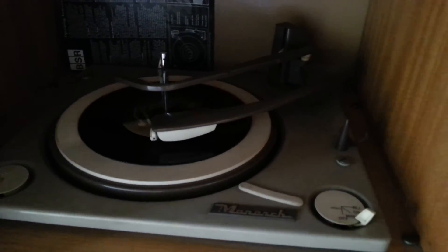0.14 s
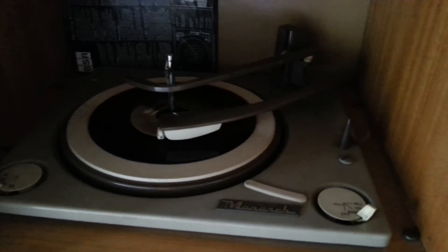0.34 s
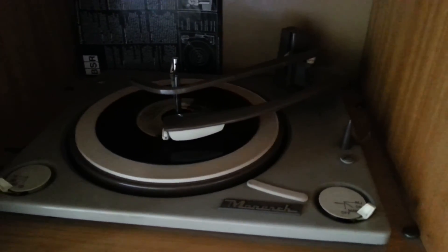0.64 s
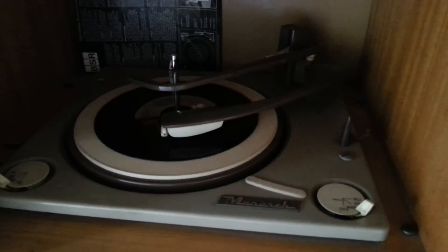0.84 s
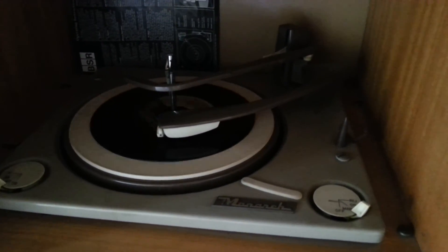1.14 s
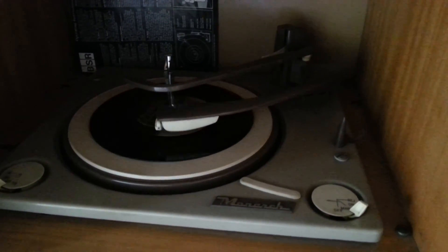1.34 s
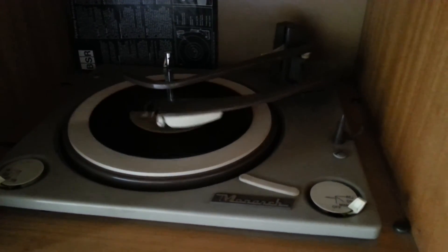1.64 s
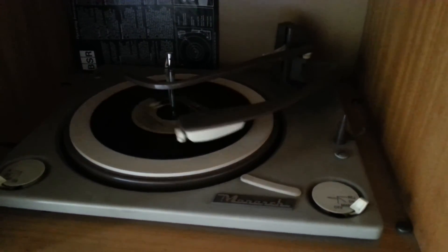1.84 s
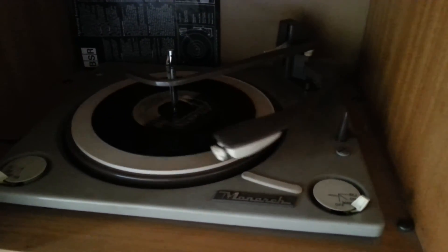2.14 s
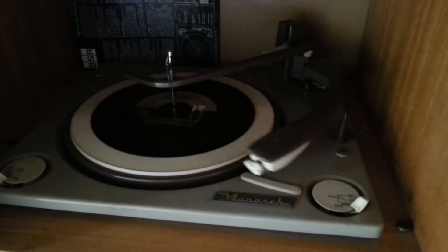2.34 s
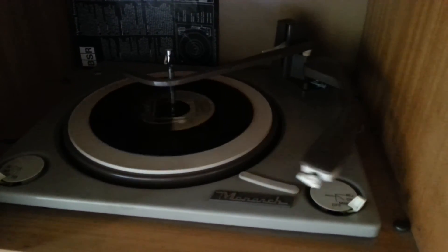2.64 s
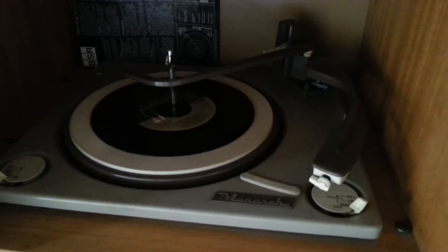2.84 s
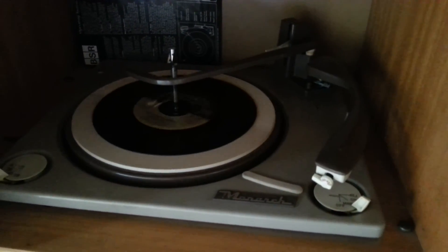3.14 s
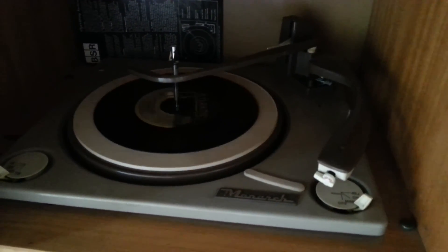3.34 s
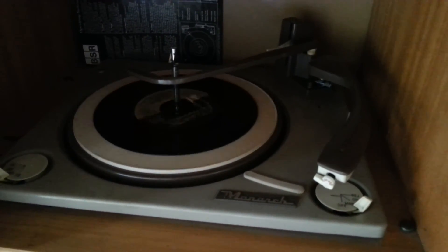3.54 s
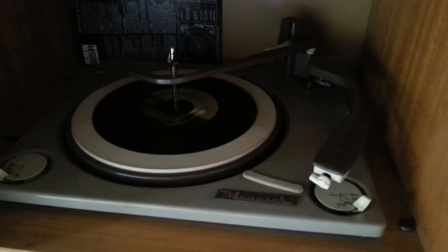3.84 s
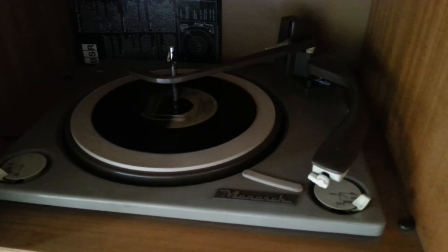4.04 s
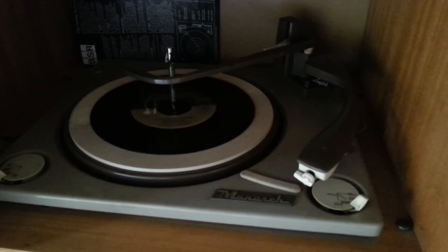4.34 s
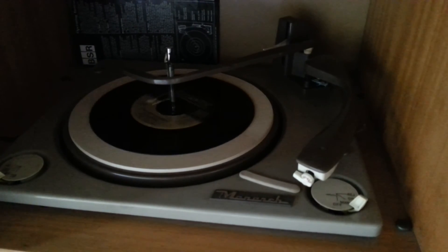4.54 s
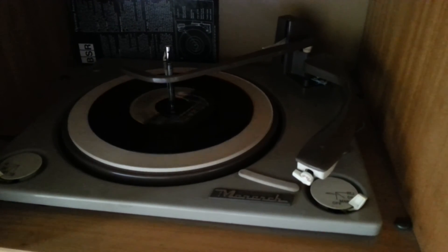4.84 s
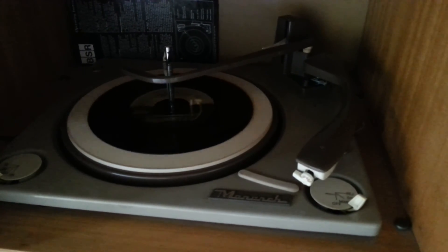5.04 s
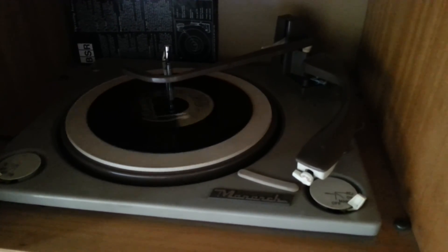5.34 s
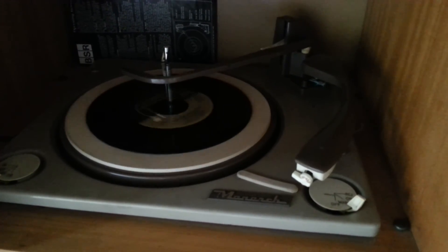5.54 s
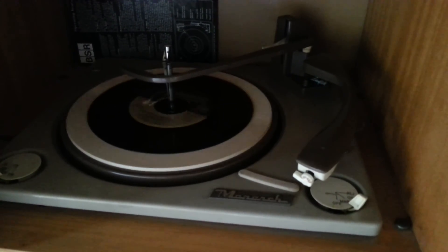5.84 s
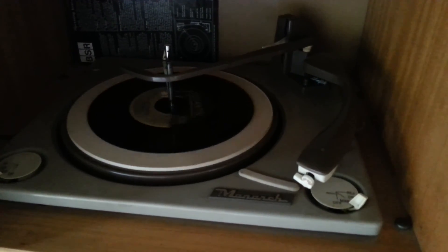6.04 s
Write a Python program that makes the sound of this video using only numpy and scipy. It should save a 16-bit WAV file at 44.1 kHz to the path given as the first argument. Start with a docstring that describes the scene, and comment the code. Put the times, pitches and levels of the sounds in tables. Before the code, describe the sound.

A phone near a turntable picks up steady low hum, rumble and faint bearing whine. After a quiet start, levers strike the steel deck in a rapid rattle of clunks and slide dryly. Separate clicks lead to one sharp, very loud clack in the middle, with a short indoor tail. Then it calms: a faint squeak, a small cluster of ticks, a pause, and scattered light clicks at the end.

```python
"""A record changer in a wooden cabinet trips, lifts its arm and swings it back to rest, close to a phone.
Cams and levers strike the steel deck: shaped noise bursts over decaying modes, with a diffuse room tail.
Between blows parts slide, as noise through resonances, and a faint squeak glides up in pitch.
Behind, the motor hums, strongest at twice the mains rate, over bearing whine, rumble and microphone hiss."""
import sys
import numpy as np
from scipy import signal
from scipy.fft import rfft, irfft
from scipy.io import wavfile
from scipy.ndimage import uniform_filter1d

SR = 44100
rng = np.random.default_rng(int(sys.argv[2]) if len(sys.argv) > 2 else 0)


def bounce(signal):
    """Save signal as a 16-bit WAV file at the path given by the first command-line argument."""
    frames = np.transpose(np.atleast_2d(signal))
    limited = np.clip(frames, -1, 1)
    pcm = np.round(limited * 32767).astype(np.int16)
    wavfile.write(sys.argv[1], SR, pcm)


N = 273420
T = np.arange(N) / SR  # seconds

# Blows on the deck. Each row: start in seconds, level at the knee in dB before the deck's bass loss,
# knee in Hz, fall below it in dB per octave, fall above it in dB per octave (negative falls are rises),
# cabinet boom in the lowest band in dB, rattle length in seconds, room feed in dB against the direct sound.
BLOWS = [(0.603, -37, 800, -11, 5, -44, 0.017, -17), (0.677, -30, 2690, 5.5, 6, -52, 0.025, -10),
         (0.689, -25, 890, 10, 6, -29.5, 0.018, -16.5), (0.758, -57, 1900, 3, 7, -54, 0.015, -17),
         (0.769, -20, 2580, 0, 15, -38, 0.01, -20), (0.8353, -38.5, 4400, 0.5, 2, -34.5, 0.01, -13.5),
         (0.964, -39, 2500, 11, 11, -49, 0.0083, -24), (1.043, -46.5, 2500, 3, 4.5, -55, 0.011, -20),
         (1.247, -41.5, 450, 4, 11, -42, 0.014, -18), (1.64, -33, 1600, 8, 14.5, -58, .016, -17.5),
         (1.916, -30.5, 1720, 7, 1, -52, 0.012, -17), (2.493, -48, 2490, -0.5, 4, -66, 0.02, -9.5),
         (2.504, -37, 3360, 12.5, 8, -65, .011, -17), (2.61, -40.5, 2500, -1.5, 9.5, -55, 0.013, -12),
         (2.7418, -11, 3940, 4.5, 1, -55, 0.017, -16.5), (2.826, -38.5, 2530, 5.5, 13, -68, 0.012, -2.5),
         (3.804, -47.5, 860, -1, 11, -70, 0.018, -13), (4.131, -44, 1500, 11, 15, -65, 0.015, -11),
         (4.146, -48.5, 1800, -1.5, 6, -64, 0.029, -3), (4.205, -31.5, 5000, 3, 1, -70, 0.0086, -18),
         (4.251, -45, 1610, 6, 11, -70, 0.011, -10), (5.057, -42.5, 1300, 3, 10, -59, 0.025, -19),
         (5.466, -53.5, 1500, -1.5, 11, -75, .016, -19), (5.521, -40, 900, -0.5, 10, -54.5, .011, -13),
         (5.813, -55.5, 1100, -4, 9, -64, 0.017, -4), (5.845, -40.5, 3650, 3, 9.5, -74, 0.011, -11),
         (6.014, -34, 1440, -0.3, 11.5, -55, .011, -12), (6.034, -34, 495, -3, 7, -50, 0.026, -18),
         (6.132, -35.5, 2500, 5, 4, -59.5, 0.012, -17)]
# Edges of the bands in which each blow is levelled, in Hz.
BAND_EDGES_HZ = [150, 330, 650, 1250, 2000, 3200, 6000, 15000]
# Ringing modes of the steel deck. Each row: nominal pitch in Hz, nominal strength in dB, T60 in seconds.
DECK_MODES = [(581, -3.5, 0.16), (738, 0, 0.17), (830, 11, 0.062), (980, 13, 0.034), (1135, -5, 0.19),
              (1422, 2.5, .13), (1658, 10.5, 0.022), (1870, -3, 0.11), (2140, 0.5, 0.057), (2402, 3, 0.075),
              (3100, -2, 0.042), (3220, -1, 0.036), (3725, 2, 0.1), (4690, 6.5, 0.037)]
# Modes of the wooden cabinet. Each row: nominal pitch in Hz, nominal strength in dB, T60 in seconds.
CABINET_MODES = [(70.4, -9.5, .15), (171, -6.5, 0.68), (208.6, 10.5, 0.11), (295.6, -2, 0.24),
                 (360, -4.5, 0.21), (435, -3.5, 0.11)]
# Cam and levers sliding, and the low cabinet thump at 1.247 s. Each row: start of full level in seconds,
# length held in seconds, nominal levels of scrape, cabinet rumble and arm post groan in dB.
SLIDES_AND_THUMP = [(.63, .27, -46, -43, -55), (0.934, 0.3, -51, -56.5, -78), (1.247, .03, -66, -45, -58),
                    (2.53, .02, -58, -70, -72), (2.62, 0.23, -56.5, -58.5, -48),
                    (4.169, 0.064, -53.5, -50.5, -46.5)]
# Lever resonances in the scrape. Each row: pitch in Hz, width in Hz, gain in dB.
SCRAPE_PEAKS = [(1365, 26, 0), (2000, 170, -11), (2514, 47, 0.5), (2980, 16, 3.5), (3240, 240, -6.5),
                (3690, 93, -15), (4700, 51, -11)]
# Resonances of the groaning arm post. Each row: pitch in Hz, width in Hz, gain in dB.
GROAN_PEAKS = [(366, 47, -10), (433, 42, -1.5)]
# Path of the faint squeak. Each row: time in seconds, pitch in Hz, nominal level in dB.
SQUEAK_PATH = [(3.45, 3200, -72), (3.49, 3300, -53), (3.56, 3380, -54), (3.629, 3600, -64)]
# Motor hum. Each row: multiple of the mains rate, nominal level in dB rms.
HUM_PARTIALS = [(1, -95.5), (2, -51), (3, -63), (4, -68.5), (6, -72.5), (7, -71), (8, -72)]
# Bearing whine. Each row: pitch in Hz, width in Hz, gain in dB.
WHINE_PEAKS = [(890, 76, -10), (2694, 40, -2.5), (4190, 14, 5.5), (4290, 19, -1.5), (4540, 13, 2),
               (4920, 14, -1), (5700, 23, -4.5), (4160, 310, -15)]
# Spectrum of the rumble and hiss. Each row: frequency in Hz, relative density in dB per Hz.
FLOOR_SPECTRUM = [(20, -20), (45, -11.5), (70, -5.5), (130, -19), (200, -7), (300, -4), (574, -10),
                  (874, -8.5), (1490, -13), (3000, -17), (4250, -18.5), (6110, -21), (13900, -20)]
# Likeness of the two microphone ports. Each row: frequency in Hz, likeness from 0 to 1.
PORT_LIKENESS = [(30, 0.6), (60, 0.96), (130, 0.5), (290, 0.62), (640, 0.25), (1400, 0)]

RING_DB = -16.5  # ringing against rattle
BOOM_FALL_DB = 19  # per octave above the lowest band
DECK_LOW_HZ, DECK_LOSS_DB = 806, 11.5  # the thin deck radiates poorly below this; loss per octave
ROOM_T60_S = 0.32
SLIDE_ATTACK_S, SLIDE_RELEASE_T60_S = 0.023, 0.3
MAINS_HZ = 49.978
HUM_LEFT_LEAD = 0.26  # radians per multiple
DUCK_ABOVE_DB, DUCK_POWER = -16, 0.6
TOP_HZ = 14900


def undb(db):
    """Decibels to amplitude."""
    return 10 ** (np.asarray(db) / 20)


def level(x, db):
    """Set the overall rms level."""
    return x * undb(db) / np.sqrt(np.mean(x ** 2))


def pan(db):
    """Gains for the left and right ports; db is left minus right."""
    return undb(np.array([[db], [-db]]) / 2)


def band(x, lo_hz, hi_hz):
    """Pass only the sound between two frequencies."""
    return signal.sosfilt(signal.butter(3, [lo_hz, hi_hz], "band", fs=SR, output="sos"), x)


def fade(t, t60):
    """Exponential decay that loses 60 dB in t60 seconds."""
    return np.exp(-np.log(1000) * t / t60)


def walk(rate):
    """Random levels held 1 / rate s and smoothed twice."""
    k = int(SR / rate)
    held = np.repeat(rng.standard_normal(N // k + 1), k)
    return 1.03 * uniform_filter1d(uniform_filter1d(held, k), k)[:N]


def resonate(peaks):
    """Two unrelated noises through narrow resonances."""
    x = rng.standard_normal((2, N))
    return sum(undb(db) * signal.lfilter(*signal.iirpeak(hz, hz / w, SR), x) for hz, w, db in peaks)


def ring_modes(t):
    """Deck and cabinet modes decay as sines, with new strengths and slightly new pitches each blow."""
    hz, mode_db, t60 = np.transpose(CABINET_MODES + DECK_MODES)[:, :, None]
    gain = undb(mode_db + 2.5 * rng.standard_normal(hz.shape))
    here_hz = hz * (1 + 0.0061 * rng.standard_normal(hz.shape))
    # long waves reach both ports alike, short ones by unrelated paths
    port_phase = np.minimum(hz / 900, 4) * rng.standard_normal((2, len(hz), 1))
    phase = 2 * np.pi * rng.random(hz.shape) + port_phase
    return np.sum(gain * np.sin(2 * np.pi * here_hz * t + phase) * fade(t, t60), axis=1)


def rattle_burst(t, rattle_s):
    """Echoes between the cabinet walls hold the noise up a little at first, then it drops."""
    noise = rng.standard_normal((3, len(t)))
    shared = band(noise[2] - noise[:2] / 2, 100, 1000)  # low part mostly common to both ports
    return (noise[:2] + shared) * np.exp(-(t / rattle_s) ** 1.17)


def blows():
    """Each blow rattles briefly and rings the modes, levelled by band; returns direct sound and room feed."""
    near, far = np.zeros((2, N + SR)), np.zeros((2, N + SR))
    t = np.arange(SR // 4) / SR
    centres = np.sqrt(np.multiply(BAND_EDGES_HZ[:-1], BAND_EDGES_HZ[1:]))
    deck_loss = undb(DECK_LOSS_DB * np.minimum(np.log2(centres / DECK_LOW_HZ), 0))
    for s, top_db, top_hz, below_db, above_db, boom_db, rattle_s, room_db in BLOWS:
        octaves = np.log2(centres / top_hz)
        slope_db = np.where(octaves < 0, -below_db, above_db)
        strike = undb(top_db - slope_db * octaves) * deck_loss
        boom = undb(boom_db - BOOM_FALL_DB * np.log2(centres / centres[0]))
        hit = undb(RING_DB) * ring_modes(t) + rattle_burst(t, rattle_s)
        hit = hit * (1 - np.exp(-t / 0.0016))  # soft onset
        hit = signal.lfilter(*signal.butter(1, 7000, fs=SR), hit)
        at = slice(int(s * SR), int(s * SR) + len(t))
        for lo, hi, size in zip(BAND_EDGES_HZ, BAND_EDGES_HZ[1:], np.hypot(strike, boom)):
            part = band(hit, lo, hi)
            # level each port by its first 1/70 s
            part = part / np.sqrt(np.mean(part[:, :SR // 70] ** 2, axis=1, keepdims=True))
            near[:, at] += size * pan(-3.5) * part
            far[:, at] += size * undb(room_db) * part
    return near[:, :N], far[:, :N]


def room(x):
    """Diffuse tail of decaying noise, different at each port; the highest treble dies sooner."""
    t = np.arange(SR // 2) / SR
    noise = rng.standard_normal((2, len(t))) * (1 - np.exp(-t / 0.0017))
    low = band(noise, 250, 3000) * fade(t, ROOM_T60_S)
    high = band(noise, 2130, 9700) * fade(t, 1.045 * ROOM_T60_S)
    top = band(noise, 6960, 21800) * fade(t, 0.75 * ROOM_T60_S)
    tail = (low + high + top) / np.sqrt(np.sum(low[0] ** 2))
    return signal.fftconvolve(x, tail, axes=1)[:, :N] * pan(-2.0)


def slides_and_thump():
    """Stick-slip scrape through lever resonances, a low groan, and rumble or thump in the cabinet's modes."""
    s, length, *layer_db = np.transpose(SLIDES_AND_THUMP)[:, :, None]
    attack = np.clip(1 + (T - s) / SLIDE_ATTACK_S, 0, 1) ** 2  # rises just ahead of the start
    shape = attack * fade(np.maximum(T - s - length, 0), SLIDE_RELEASE_T60_S)
    scrape_gain, rumble_gain, groan_gain = (np.sum(undb(db) * shape, axis=0) for db in layer_db)

    broad = undb(-9.5) * band(rng.standard_normal((2, N)), 480, 2700)
    scrape = level(resonate(SCRAPE_PEAKS) + broad, 0)
    flicker = undb(2.0 * walk(29.94) + 2.5 * walk(150))
    rumble = level(resonate([(hz, 25, db) for hz, db, _ in CABINET_MODES])[0], 0)
    rumble = band(rumble, 55, 900)
    groan = level(band(resonate(GROAN_PEAKS)[0], 254, 600), 0)
    return (scrape * scrape_gain * flicker + groan * groan_gain + rumble * rumble_gain) * pan(-3.0)


def squeak():
    """A gliding sine, its strength scrambled by smoothed noise into a breathy narrow band."""
    s, hz, db = np.transpose(SQUEAK_PATH)
    turns = np.cumsum(np.interp(T, s, hz)) / SR
    breath = np.array([walk(400), walk(400)])
    return breath * np.sin(2 * np.pi * turns) * undb(np.interp(T, s, db, -120, -120)) * pan(1.8)


def motor():
    """Mains multiples, nearly steady, and the whine of bearings as noise through narrow resonances."""
    lead = np.array([[HUM_LEFT_LEAD], [0]])
    angle = 2 * np.pi * MAINS_HZ * T + lead
    hum = sum(np.sqrt(2) * undb(db + 0.2 * walk(7.6)) * np.sin(k * angle) for k, db in HUM_PARTIALS)
    whine = level(resonate(WHINE_PEAKS), -63)
    return hum * pan(-2.5) + whine * pan(-7.5)


def floor():
    """Shaped noise: motor rumble largely shared by both ports, and hiss of their own; the mids flicker."""
    f = np.maximum(np.arange(N // 2 + 1) * SR / N, 1)

    def at(table):
        """Read a table along log frequency."""
        table_hz, value = np.transpose(table)
        return np.interp(np.log(f), np.log(table_hz), value)

    alike = np.clip(at(PORT_LIKENESS), 0, 1)
    noise = rfft(rng.standard_normal((2, N))) * undb(at(FLOOR_SPECTRUM))
    mid, side = noise * np.sqrt([1 + alike, 1 - alike])
    out = irfft(np.array([mid + side, mid - side]), N)
    out = out + band(out, 256, 1460) * (undb(2.5 * walk(11.0)) - 1)
    return level(out, -52) * pan(-3)


def scene():
    """The changer at work, its room, and the background."""
    near, far = blows()
    return near + room(far) + slides_and_thump() + squeak() + motor() + floor()


def record(dry):
    """The phone turns loud moments down after a short lag, clips peaks, and cuts deep bass and the top."""
    step = 1 / (0.006 * SR)  # 6 ms
    loud = np.abs(dry).max(axis=0)
    for _ in range(2):  # a sluggish level detector
        loud = signal.lfilter([step], [1, step - 1], loud)
    gain = np.minimum(1, undb(DUCK_ABOVE_DB) / (loud + 1e-9)) ** DUCK_POWER
    clipped = np.clip(dry * gain, -0.95, 0.95)
    thin = signal.sosfilt(signal.butter(2, 45, "high", fs=SR, output="sos"), clipped)
    return signal.sosfilt(signal.ellip(10, 0.2, 75, TOP_HZ, fs=SR, output="sos"), thin)


dry = scene()
out = record(dry)
bounce(out)
```